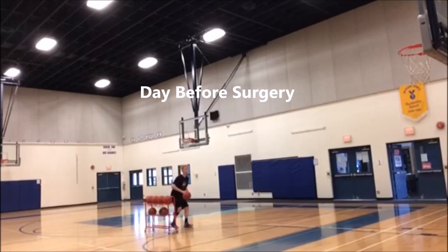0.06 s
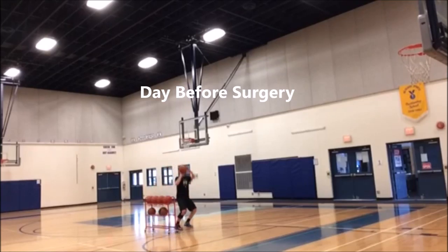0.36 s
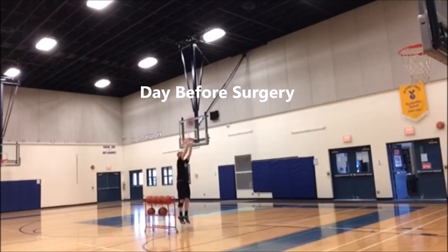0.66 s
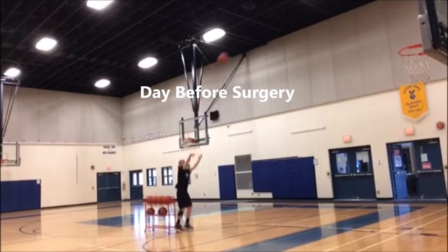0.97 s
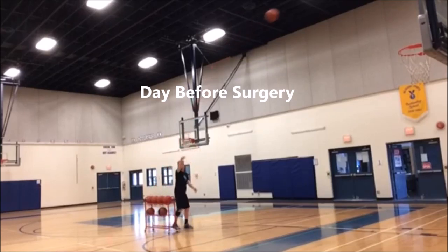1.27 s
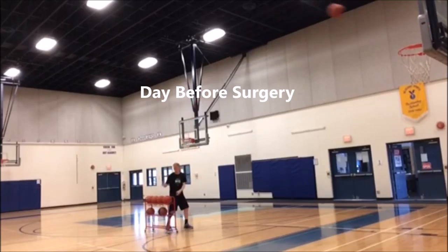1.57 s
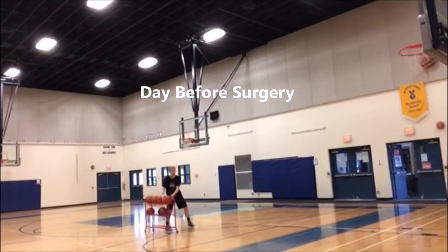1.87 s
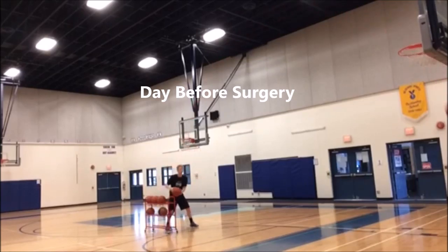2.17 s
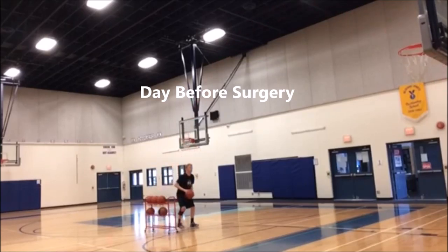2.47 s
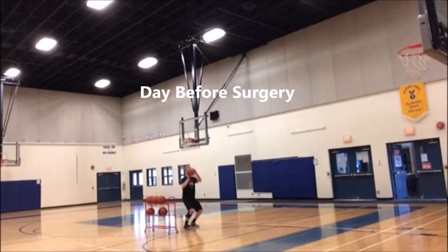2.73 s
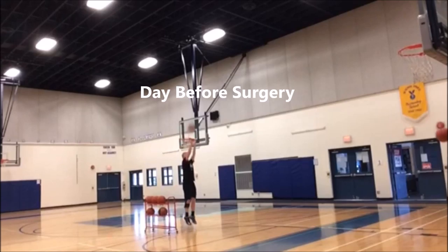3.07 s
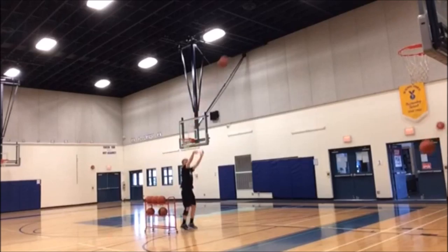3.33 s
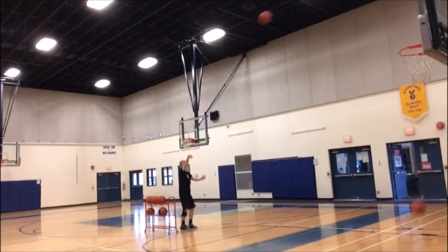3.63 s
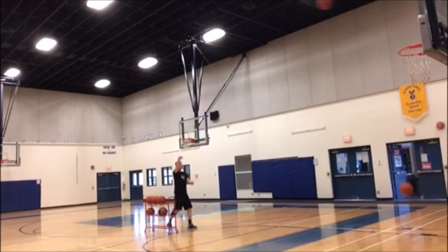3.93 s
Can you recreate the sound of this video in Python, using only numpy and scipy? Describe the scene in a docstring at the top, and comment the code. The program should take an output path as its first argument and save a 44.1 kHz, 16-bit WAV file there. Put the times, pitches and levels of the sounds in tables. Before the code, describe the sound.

A basketball shot in a large, reverberant gym: a brief shoe squeak and a landing, then the ball clatters in the hoop and bounces twice close by with a faint ping, with another shoe landing between the bounces.

```python
"""A large, echoing gym during shooting practice. A shoe squeaks by stick-slip friction, and the player
jumps and lands. The ball rattles through rim and net, then strikes the sprung wooden floor twice close
by: its skin slaps, the floor's modes boom and the air modes inside it ping. The reverberation of an
earlier bounce is still decaying at the start, over the rumble of the ventilation."""
import sys
import numpy as np
from scipy import signal
from scipy.fft import rfft, irfft, next_fast_len
from scipy.io import wavfile

SR = 44100
rng = np.random.default_rng(int(sys.argv[2]) if len(sys.argv) > 2 else 0)


def dump(signal):
    """Clip the signal to [-1, 1] and save it as 16-bit WAV at the path in sys.argv[1]."""
    limited = np.clip(np.atleast_2d(signal).T, -1, 1)
    pcm = np.round(limited * 32767).astype(np.int16)
    wavfile.write(sys.argv[1], SR, pcm)


N = 176400


# bounces: t/s, level/dB, spot (0 by the wall, 1 on the court), treble/dB, relative hall level/dB
BALL_IMPACTS = [(2.6918, 0, 0.06, -0.5, 1), (3.8888, 0, 0.5, 6, -3)]
# wall echoes of the bounces: arrival t/s, level/dB
ECHO_ARRIVALS = [(2.7038, -14), (2.732, -22), (2.739, -9), (2.8218, -21.5), (2.8349, -18.5), (2.943, -34.5),
                 (3.9007, -26.5), (3.9309, -17.5)]
def bounces():
    """Superposition: each bounce is heard as direct sound, nearby scatter, echoes and reverberation."""
    earlier = hall(impact(spot=.1, treble_db=-10), build_s=.073)
    out = amp(-1.5) * at(earlier, -.62)  # only its tail falls within the scene
    for s, db, spot, treble_db, hall_db in BALL_IMPACTS:
        onset = s - FLOOR_LEAD_S
        direct = at(amp(db) * impact(spot, treble_db), onset)
        scatter = colour(rng.standard_normal(N) * fade(clock(), .0333), SKIN_SPECTRUM, treble_db)
        near = direct + at(amp(db - 27) * scatter, s)
        walls = [(when - s, echo_db) for when, echo_db in ECHO_ARRIVALS if 0 < when - s < 1]
        tail = amp(db + hall_db) * at(hall(impact(spot, treble_db=-3.5), build_s=.00745), onset)
        out += near + echoes(near, walls) + tail + bass_returns(direct)
    return out


# slap of the ball's skin: f/Hz, level/dB
SKIN_SPECTRUM = [(40, 7), (180, 20.5), (400, 14), (650, 10.5), (1000, 19), (1450, 19.5), (2100, 14),
                 (3100, 9), (4400, 5.5), (7400, 3.5), (10000, -2), (15000, -10)]
# air modes inside the ball: f/Hz, level/dB, T60/s
CAVITY_MODES = [(1047.4, -35.5, 0.43), (1134.4, -42, 0.49), (1257.3, -35.5, 0.515), (1506, -42, 0.27),
                (1827, -40, .5), (1917, -44, .3), (2133, -52, 0.37), (2719, -55, .5), (3219, -49, 0.54)]
FLOOR_LEAD_S = .002969  # the boom begins this long before the slap
def impact(spot, treble_db):
    """Impulse excitation: the skin slaps twice within a moment, the cavity pings and the floor booms."""
    force = impulse(0) + amp(-18.5) * impulse(.0018)
    slap = colour(force, SKIN_SPECTRUM, treble_db)
    ping = ring(CAVITY_MODES, scatter_db=0)
    return at(ping - slap, FLOOR_LEAD_S) - floor_boom(spot)


# sprung floor modes: f/Hz, level by the wall/dB, level on the court/dB, T60/s
FLOOR_MODES = [(52.83, -15, -29, .24), (78.01, -15, -8.5, 0.191), (97.28, -19.5, -16, 0.24),
               (116.12, -14, -18, 0.1525), (139.7, -17.5, -17.5, 0.094), (171.78, -15.5, -20, 0.0458),
               (263.2, -28, -29.5, 0.19), (354.3, -28, -35.5, 0.144), (408.56, -26.5, -30, 0.1563)]
def floor_boom(spot, rise_s=.0063, hold_cycles=3.622):
    """Plate vibration: the spot struck sets the level of each mode, which holds briefly, then decays."""
    t, boom = clock()[:SR], np.zeros(SR)
    for hz, wall_db, court_db, t60 in FLOOR_MODES:
        decay = fade(np.maximum(t - hold_cycles / hz, 0), t60)
        boom += amp(wall_db + spot * (court_db - wall_db)) * decay * np.sin(2 * np.pi * hz * t)
    return at(boom * (1 - np.exp(-t / rise_s)), 0)


# contacts with the hoop: t/s, knock level/dB, net level/dB, net treble/dB
HOOP_CONTACTS = [(1.963, -9, -8, 1.5), (2.004, -2, -14, -6), (2.026, 0, -1, -1.5), (2.054, -7, -4, -15),
                 (2.078, 1, -14.5, -11), (2.191, -5, 0, -9.5), (2.231, -2.5, -18.5, -4)]
# rim and backboard modes: f/Hz, level/dB, T60/s
HOOP_MODES = [(330.3, -36, 0.68), (542.7, -41.5, 0.53), (600.5, -45.5, 0.45), (683.3, -42.5, 0.34),
              (852.4, -48, 0.77), (848, -47, 0.64), (1188, -35, 0.297), (1330, -41.5, 0.33),
              (2530, -63.5, 0.58), (2640, -70, .8)]
# backboard rattle and net swish: f/Hz, level/dB
BOARD_SPECTRUM = [(80, -13), (220, -4.5), (330, 1), (450, -4.5), (620, 1.5), (1250, -3), (1800, -16.5),
                  (3000, -36.5), (6000, -39.5), (15000, -53.5)]
NET_SPECTRUM = [(300, -32.5), (1200, -2.5), (1800, 3.5), (2700, 1), (3600, -2.5), (4500, -6.5), (7500, -9),
                (10000, -20), (15000, -30)]
def hoop():
    """Damped free vibration: each contact rings rim and board, whips the net and excites the hall."""
    t, out = clock(), np.zeros(N)
    for s, knock_db, net_db, treble_db in HOOP_CONTACTS:
        rattle = amp(-25.5) * noise(BOARD_SPECTRUM) * fade(t, .195)
        clang = amp(-6) * ring(HOOP_MODES, scatter_db=1.5)
        knock = amp(knock_db) * (rattle + clang) * (1 - np.exp(-t / .0015))
        swish_envelope = fade(t, .0661) * (1 - np.exp(-t / .003))
        swish = amp(net_db - 29) * noise(NET_SPECTRUM, treble_db) * swish_envelope
        snap = amp(net_db - 6) * colour(impulse(0), NET_SPECTRUM, treble_db)
        tail = hall(amp(1.5) * knock + snap, build_s=.0099)
        out += at(knock + swish + tail, s)
    return out


# shoes meeting the floor: t/s, level/dB, treble/dB
FOOTFALLS = [(0.631, -18, 8), (1.0439, 6.5, -10), (1.0571, 2, 0), (1.602, -22, 14), (3.458, 2, -7),
             (3.4685, -1, 2)]
# slap of a sole: f/Hz, level/dB
SOLE_SPECTRUM = [(60, -9), (250, 0), (550, 2), (850, -1), (1200, 2), (1600, -1), (2000, 3), (2600, -8),
                 (5000, -15.5), (9000, -27.5), (15000, -33)]
# wall echoes of the shoes: delay t/s, level/dB
STEP_ECHOES = [(.031, -12.5), (.043, -16), (.051, -12.5), (.086, -19), (.1, -8)]
def steps():
    """Impact noise: a scuff at take-off, and two soles slapping down in turn at each landing."""
    out = np.zeros(N)
    for s, db, treble_db in FOOTFALLS:
        force = impulse(0) + amp(-20.5) * rng.standard_normal(N) * fade(clock(), .0262)
        out += at(amp(db - 8.5) * colour(force, SOLE_SPECTRUM, treble_db), s)
    return out + echoes(out, STEP_ECHOES) + amp(2) * hall(out, build_s=.0383)


# squeak harmonics from the fundamental up: level/dB
SQUEAK_HARMONICS = [-1, -18.5, -33]
# rubber dragging: f/Hz, level/dB
DRAG_SPECTRUM = [(1500, -27), (3700, -11), (4600, 6), (5200, -6.5), (6500, -18), (15000, -35.5)]
def squeak(start_s=.305, full_grip_hz=4887, drop_hz=170):
    """Stick-slip oscillation: a rubber sole chirps once, lower in pitch while it grips lightly."""
    t = clock()
    rise_s, release_at_s, fall_s = .002, .00801, .01014
    grip = np.clip(np.minimum(t / rise_s, 1 - (t - release_at_s) / fall_s), 0, 1)
    phase = 2 * np.pi * np.cumsum(full_grip_hz - drop_hz * (1 - grip) ** 2) / SR
    tone = sum(amp(db) * np.sin(k * phase) for k, db in enumerate(SQUEAK_HARMONICS, 1))
    drag = amp(-26.5) * noise(DRAG_SPECTRUM)
    chirp = at(amp(-18) * grip * (tone + drag), start_s)
    return chirp + amp(-1.5) * hall(chirp, build_s=.011)


# reflection from a wall: f/Hz, level/dB
WALL_RESPONSE = [(100, -12), (400, 0.5), (3000, 0), (8000, 0), (12000, -6), (15500, -6)]
def echoes(x, walls):
    """Specular reflection: walls return delayed copies, thin in the bass and dull at the top."""
    reflected = colour(x, WALL_RESPONSE)
    return sum(amp(db) * at(reflected, s) for s, db in walls)


# returns of the boom: delay t/s, level/dB
FAR_END_RETURNS = [(.2, -21), (.345, -18), (.44, -15), (.485, -16)]
def bass_returns(x, cutoff_hz=294):
    """Long-path reflection: the low boom comes back from the far end of the hall."""
    bass = signal.sosfilt(signal.butter(2, cutoff_hz, fs=SR, output='sos'), x)
    return sum(amp(db) * at(bass, delay) for delay, db in FAR_END_RETURNS)


# reverberation time: f/Hz, T60/s
REVERB_TIMES = [(60, 3.51), (250, 2), (600, 2.49), (1300, 2.7262), (2700, 2), (5000, 1.2875),
                (9000, 1.1829), (15000, 0.03)]
# reverberant spectrum: f/Hz, level/dB
REVERB_SPECTRUM = [(55, -11.5), (130, -3.5), (260, 2), (500, -2.5), (1300, -2.5), (3000, -2), (5000, -8.5),
                   (8000, -9.5), (11000, -11.5), (15000, -14.5)]
def hall(x, build_s):
    """Reverberation: the tail is uneven at first, then diffuse; each band decays at its own rate."""
    t = clock()[:SR * 5 // 2]
    lumps = np.interp(t, np.linspace(0, t[-1], num=1500), rng.standard_normal(size=1500))
    reflections = rng.standard_normal(len(t)) * amp(4.2 * lumps * fade(t, 3.5))
    hz, frame_t, bands = signal.stft(reflections, SR, nperseg=512)
    envelope = fade(frame_t, along(REVERB_TIMES, hz)[:, None]) * (1 - np.exp(-frame_t / build_s))
    energy = np.sum(envelope ** 2, axis=1, keepdims=True) * frame_t[1] * SR
    envelope *= amp(along(REVERB_SPECTRUM, hz))[:, None] / np.sqrt(energy)
    response = signal.istft(bands * envelope, SR)[1]
    return signal.fftconvolve(x, response)[:N]


# ventilation rumble: f/Hz, level/dB
VENT_SPECTRUM = [(20, -25), (36, -13.5), (58, -6.5), (90, 0), (130, -1), (200, -6), (310, -7.5), (460, -19),
                 (700, -20.5), (1200, -28), (2000, -32.5), (3200, -43.5), (5000, -48.5), (9000, -53.5),
                 (15500, -58)]
def ventilation():
    """Stationary broadband noise: the ventilation rumbles steadily, strongest in the bass."""
    return amp(-42) * noise(VENT_SPECTRUM)


def amp(db):
    """Decibel law: level to amplitude ratio."""
    return 10 ** (np.asarray(db) / 20)


def along(points, hz):
    """Interpolation of (f/Hz, value) points on a logarithmic frequency axis."""
    f, v = np.transpose(points)
    return np.interp(np.log(hz + 1), np.log(f + 1), v)


def clock():
    """Uniform sampling: t/s since a sound began."""
    return np.arange(N) / SR


def fade(t, t60):
    """Exponential decay, by 60 dB in t60 seconds."""
    return np.exp(-np.log(1000) * t / np.maximum(t60, 1e-4))


def at(x, s):
    """Time shift: x starts at s seconds, padded or cut to N samples."""
    k = int(round(s * SR))
    return np.pad(x, (max(k, 0), N))[max(-k, 0):][:N]


def impulse(s):
    """Unit impulse at s seconds."""
    return at(np.ones(1), s)


def colour(x, points, treble_db=0):
    """Minimum-phase filtering through (f/Hz, level/dB) points, with a treble shelf."""
    hz = np.fft.rfftfreq(4096, 1 / SR)
    shelf = along([(3500, 0), (6000, 1)], hz)
    cepstrum = irfft(np.log(amp(along(points, hz) + treble_db * shelf)))
    half = len(cepstrum) // 2
    cepstrum[1:half] *= 2  # folding onto positive time makes the filter causal
    cepstrum[half + 1:] = 0
    return signal.oaconvolve(x, irfft(np.exp(rfft(cepstrum))))[:N]


def noise(points, treble_db=0):
    """Spectral shaping: coloured noise of rms 1."""
    x = colour(rng.standard_normal(N), points, treble_db)
    return x / np.sqrt(np.mean(x ** 2) + 1e-20)


def ring(modes, scatter_db):
    """Modal superposition: damped sinusoids of random phase, their levels spread by scatter_db."""
    t, out = clock()[:SR], np.zeros(SR)
    for hz, db, t60 in modes:
        envelope = amp(db + scatter_db * rng.normal()) * fade(t, t60)
        out += envelope * np.sin(2 * np.pi * (hz * t + rng.random()))
    return at(out, 0)


def scene():
    """Linear superposition: the pressures of all sources add in one channel."""
    return (bounces() + hoop() + steps() + squeak() + ventilation())[None]


def record(dry):
    """Band limiting and saturation: the microphone loses deep bass, clips, then cuts the top treble."""
    low_cut_hz, top_hz = 31.8, 15400
    size = next_fast_len(N + SR // 2)
    hz = np.fft.rfftfreq(size, 1 / SR)
    high_pass = 1 - np.exp(-(hz / low_cut_hz) ** 4)
    low_pass = 1 / np.sqrt(1 + (hz / top_hz) ** 120)
    x = irfft(rfft(dry, size) * high_pass, size)[..., :N]
    return irfft(rfft(np.clip(x, -1, 1), size) * low_pass, size)[..., :N]


dry = scene()
out = record(dry)
dump(out)
```